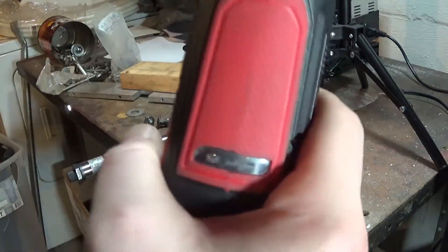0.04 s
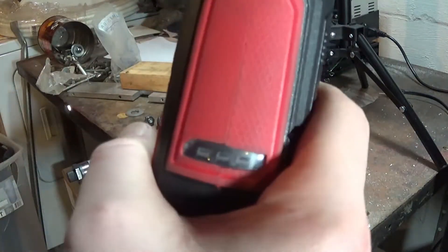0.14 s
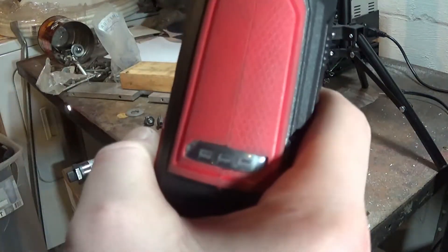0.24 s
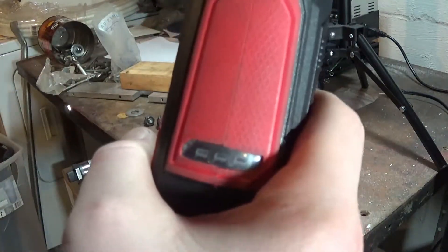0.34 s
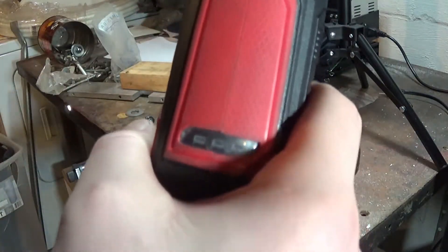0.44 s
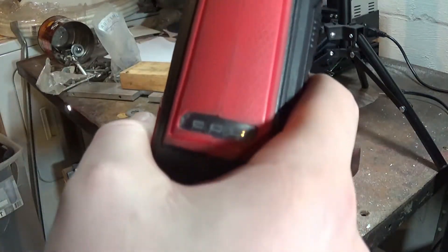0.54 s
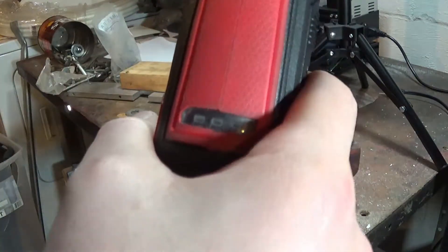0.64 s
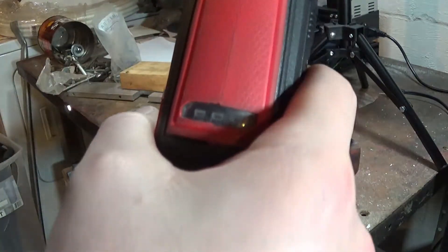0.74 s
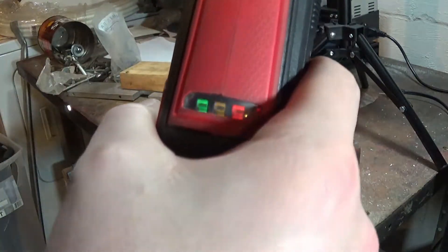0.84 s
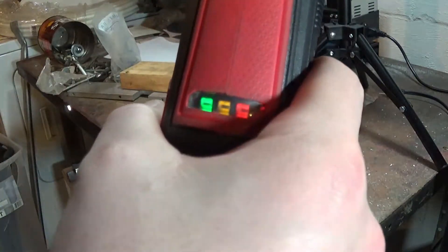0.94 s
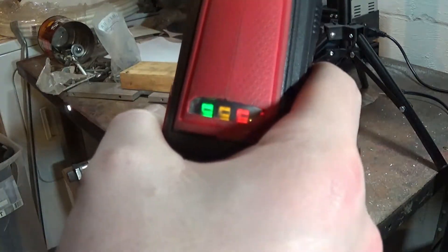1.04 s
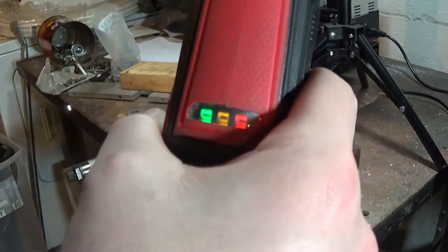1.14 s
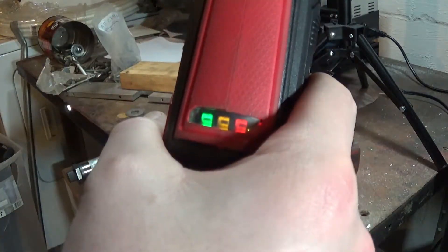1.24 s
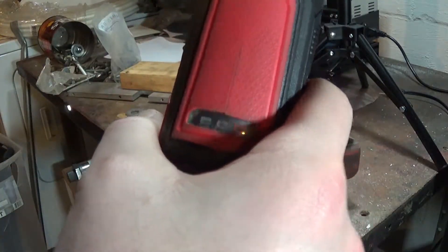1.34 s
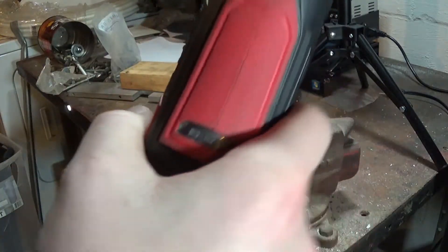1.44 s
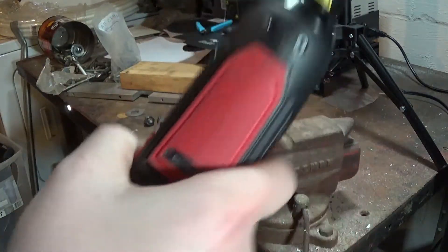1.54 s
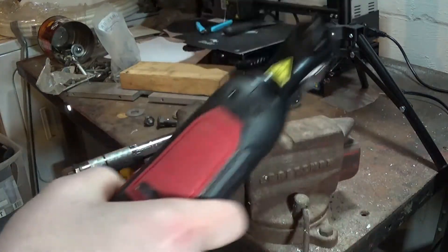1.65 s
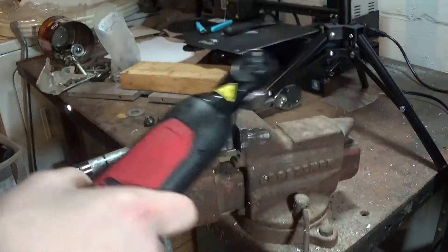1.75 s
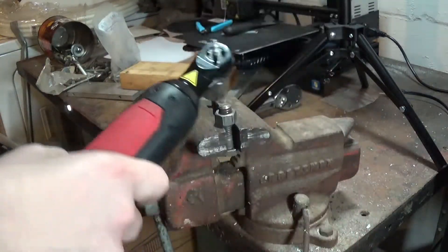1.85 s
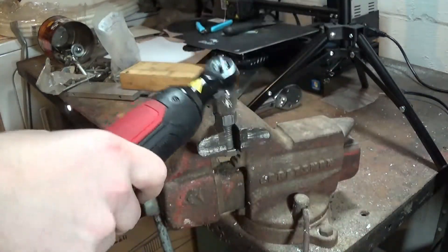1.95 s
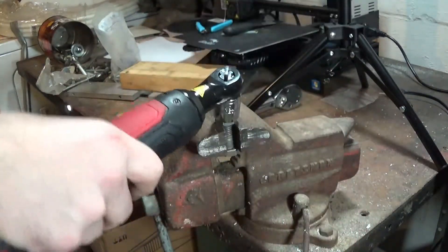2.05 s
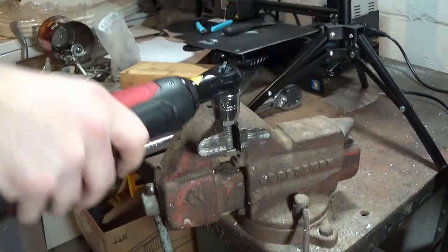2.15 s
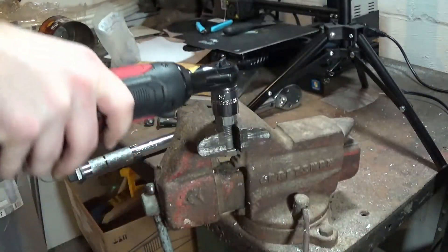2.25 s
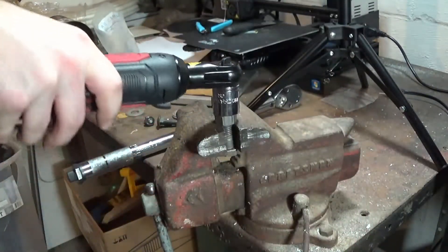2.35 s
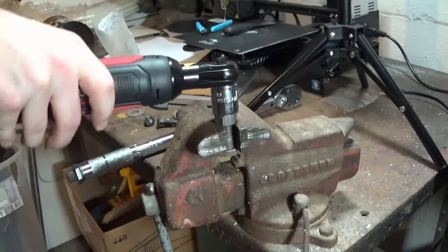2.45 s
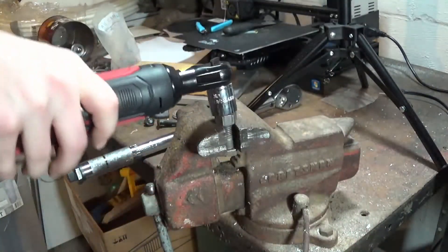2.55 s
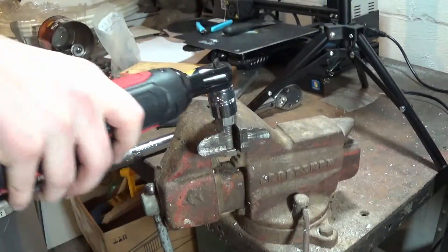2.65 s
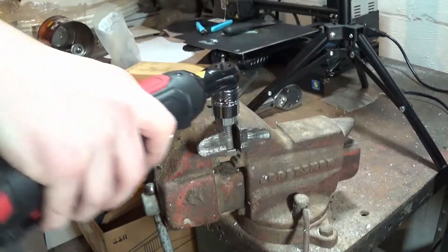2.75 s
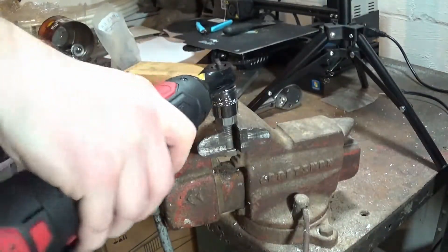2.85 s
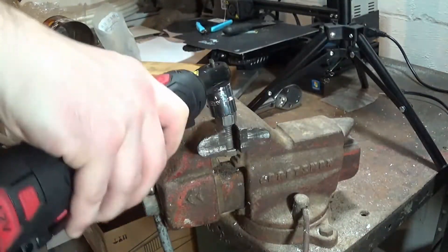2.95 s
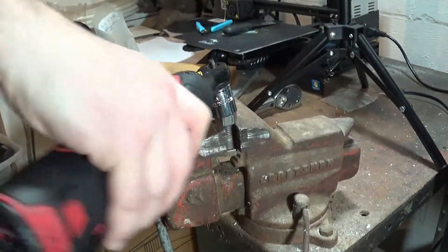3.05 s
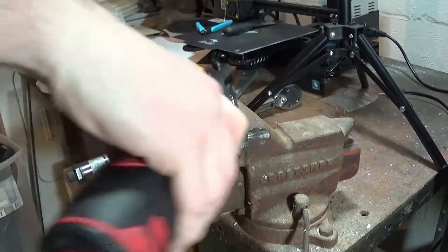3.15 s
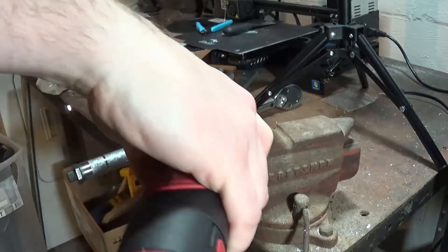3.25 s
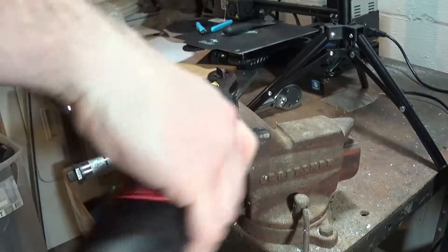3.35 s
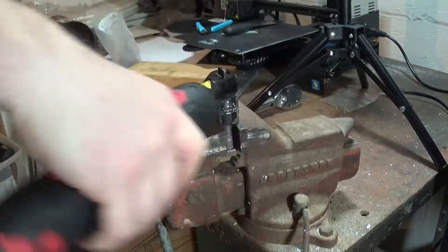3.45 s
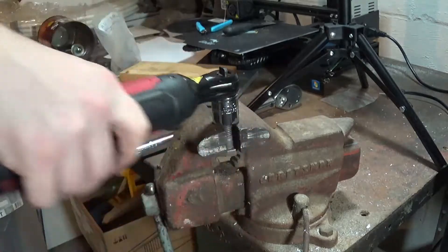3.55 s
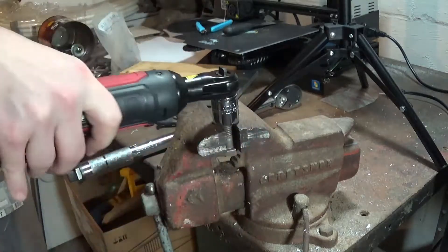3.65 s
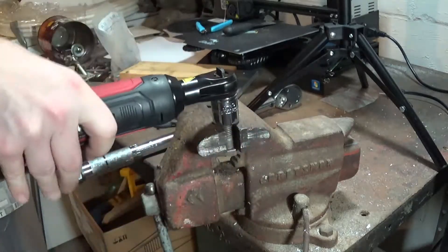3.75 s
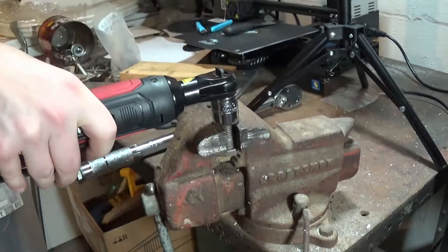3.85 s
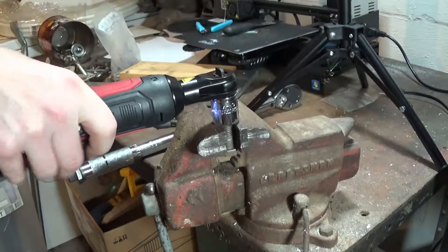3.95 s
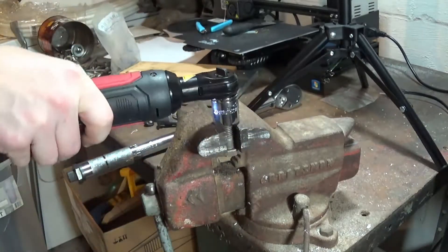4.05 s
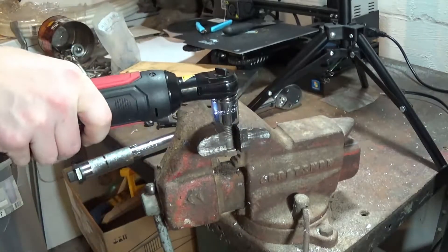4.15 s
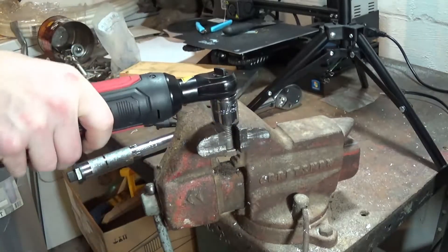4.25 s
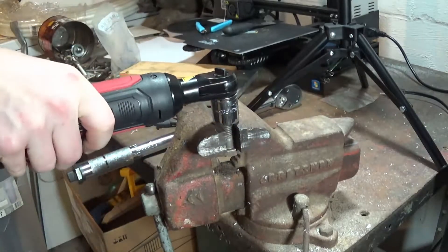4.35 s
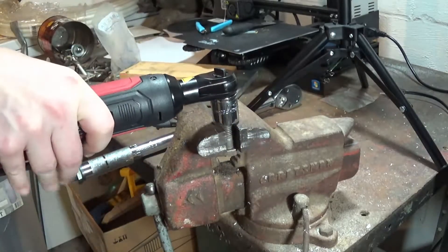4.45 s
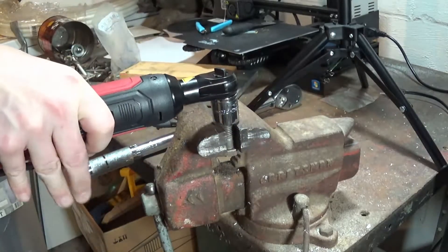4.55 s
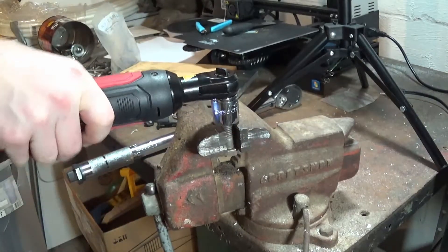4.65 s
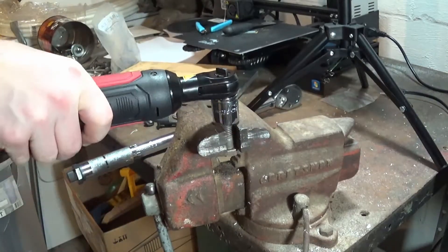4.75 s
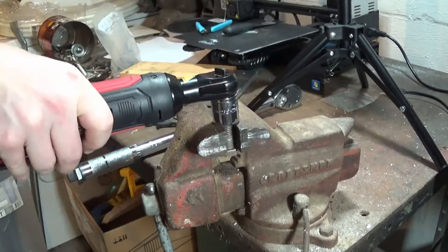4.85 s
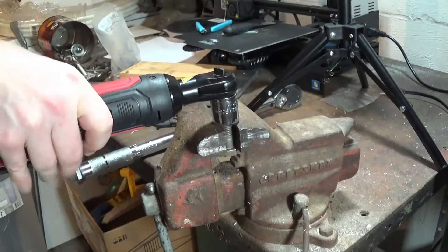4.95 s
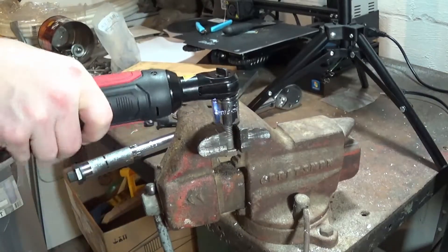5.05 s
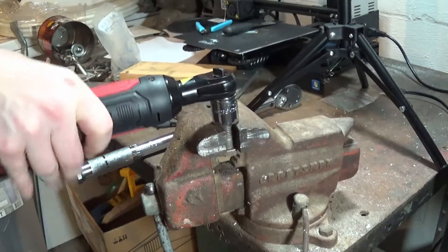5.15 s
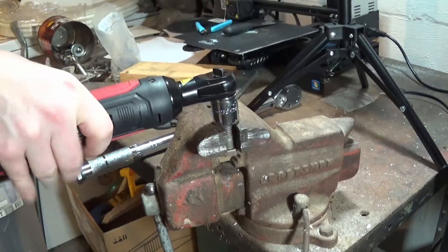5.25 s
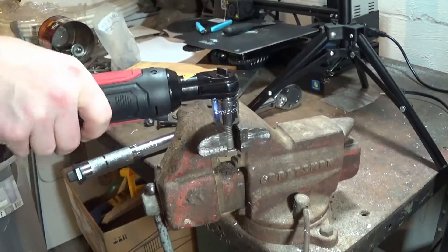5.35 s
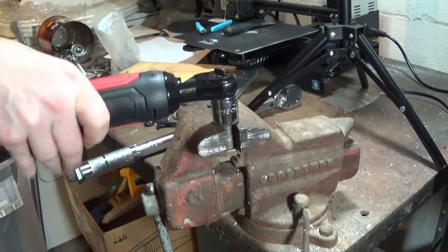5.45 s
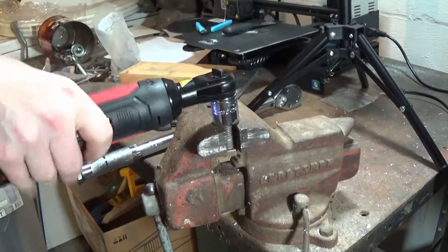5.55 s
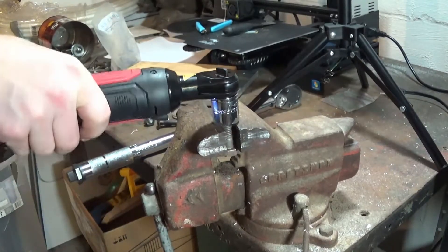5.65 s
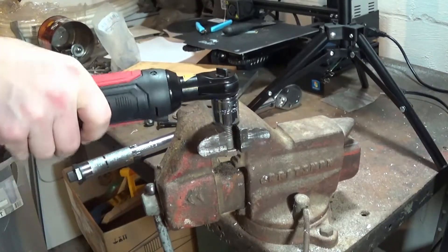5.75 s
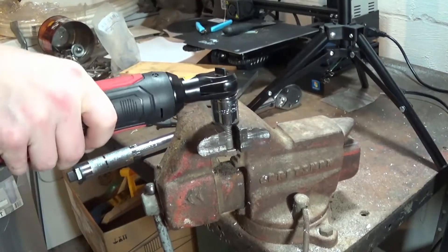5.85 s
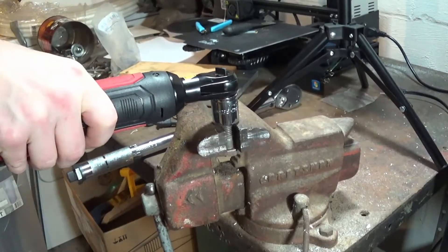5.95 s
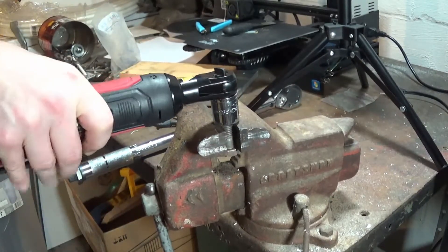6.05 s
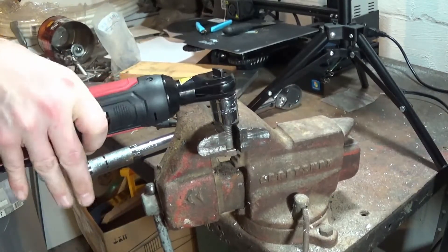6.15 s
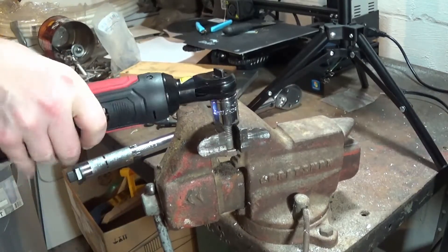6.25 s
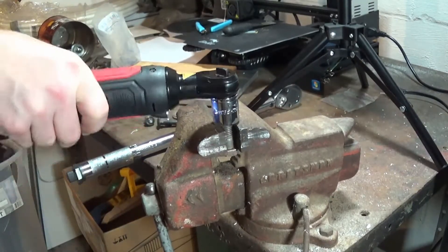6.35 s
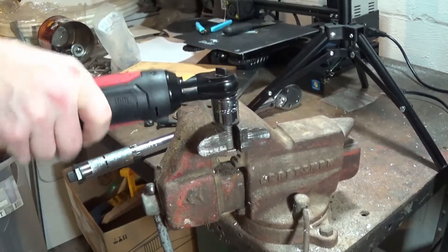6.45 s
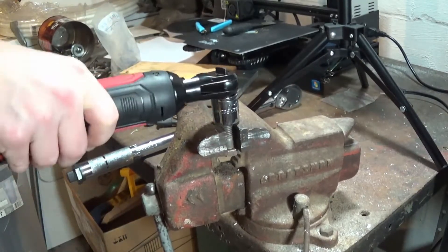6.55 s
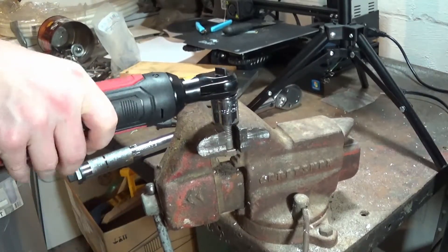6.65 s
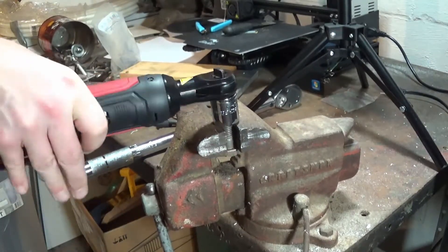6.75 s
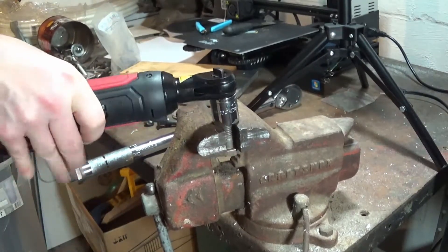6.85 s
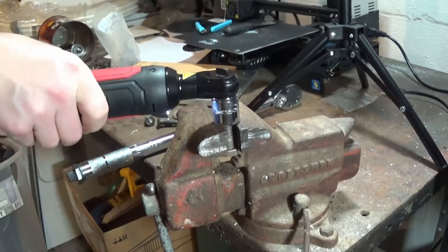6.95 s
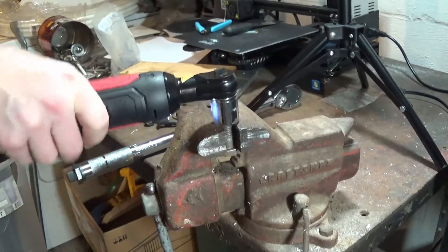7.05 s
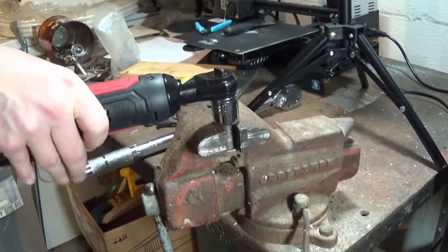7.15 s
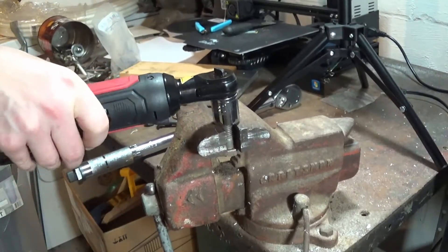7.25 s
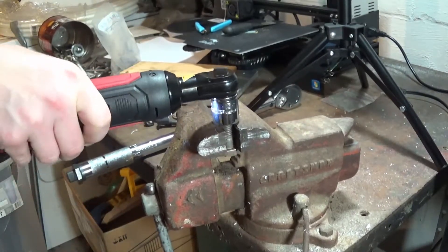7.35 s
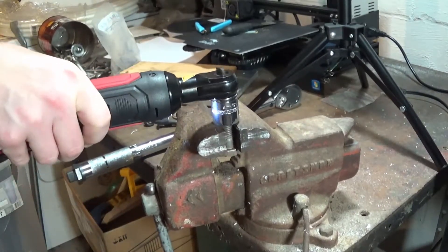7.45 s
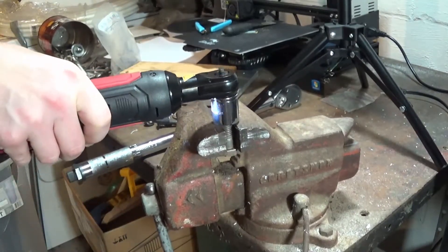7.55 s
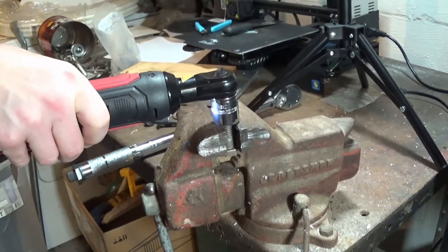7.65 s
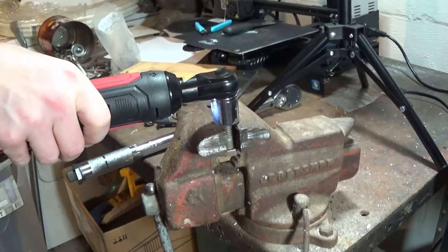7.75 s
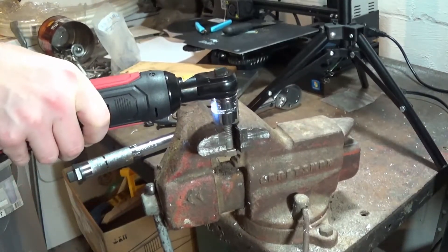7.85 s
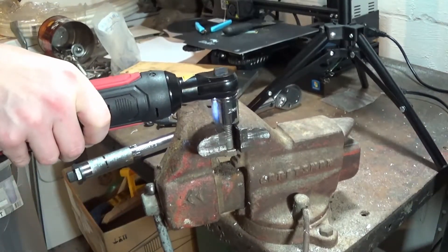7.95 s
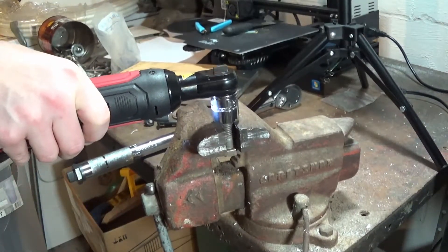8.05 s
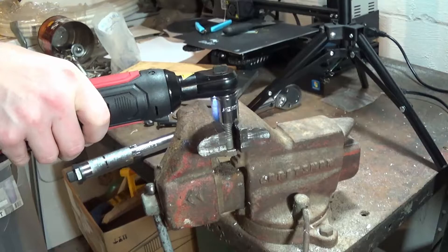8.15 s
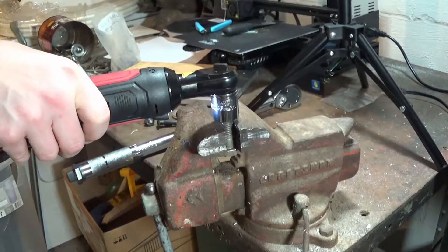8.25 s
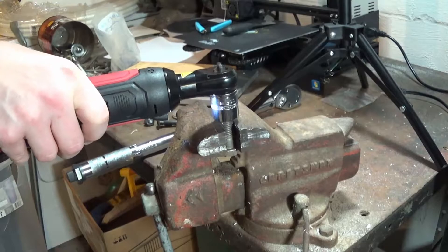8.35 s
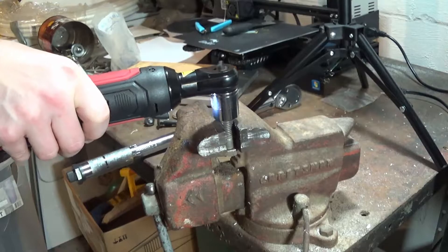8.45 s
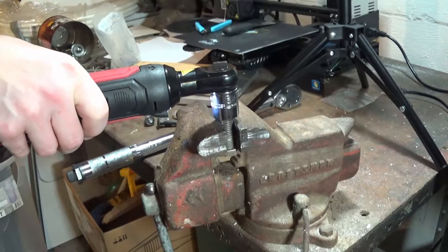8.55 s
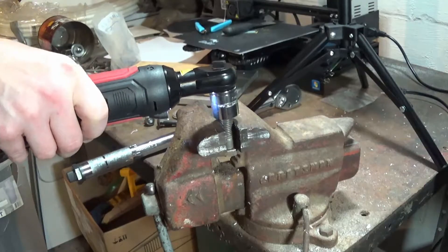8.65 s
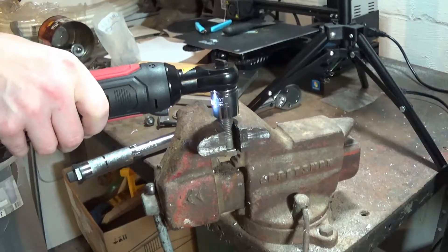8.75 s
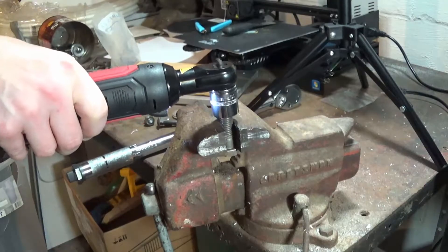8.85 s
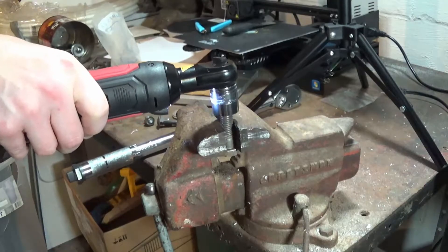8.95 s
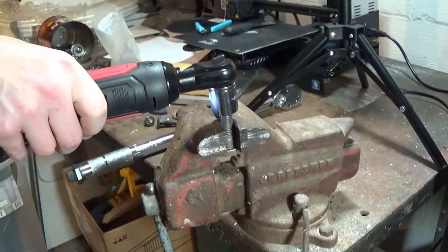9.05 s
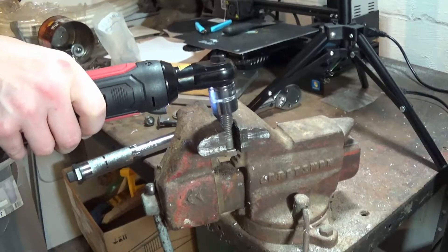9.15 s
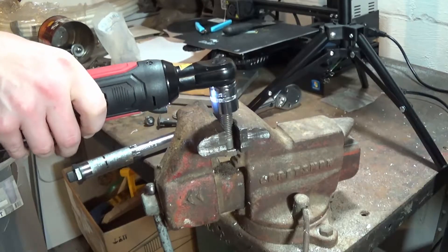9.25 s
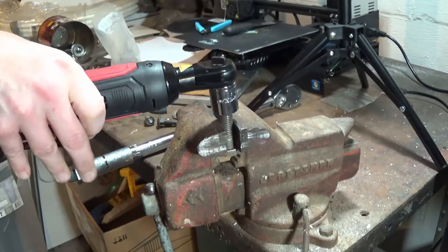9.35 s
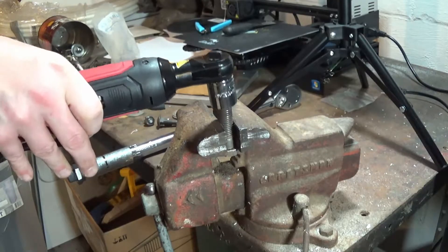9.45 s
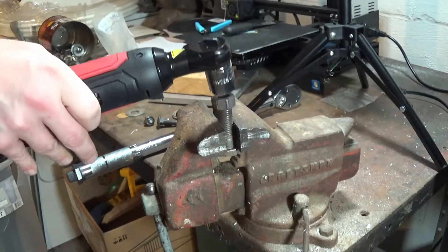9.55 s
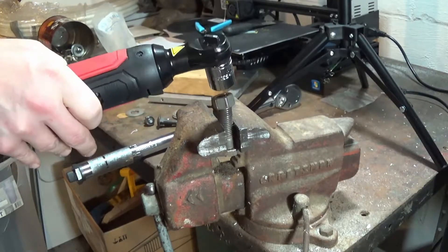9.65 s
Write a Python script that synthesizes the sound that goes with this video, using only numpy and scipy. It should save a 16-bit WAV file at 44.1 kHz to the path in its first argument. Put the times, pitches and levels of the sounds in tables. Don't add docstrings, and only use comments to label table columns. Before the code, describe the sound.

A cordless ratchet wrench whirs free up close, its socket clatters onto a bolt, strains in short clicking bursts, then buzzes in one long run.

```python
import sys
import numpy as np
from scipy import signal
from scipy.io import wavfile
from scipy.ndimage import uniform_filter1d, minimum_filter1d

SR = 44100
rng = np.random.default_rng(int(sys.argv[2]) if len(sys.argv) > 2 else 0)


def rack_gain(trim_db):
    fader = np.asarray(trim_db, float)
    return 10 ** (fader / 20)


def transcribe(u):
    v = np.clip(np.atleast_2d(u).T, -1, 1)
    q = np.round(v * 32767).astype(np.int16)
    wavfile.write(sys.argv[1], SR, q)


N = 428211

# freq_hz, density_db_per_hz
HISS_TONE = [(15, -23.5), (25, -32.5), (114, -18.5), (229, -10.5), (531, -7), (2220, -10), (3160, -6.5),
             (3820, -10.5), (8590, -12.5), (13600, -17), (16000, -10.5)]
HISS_DB = -56.5
# freq_hz, t60_s
ROOM_DECAY = [(250, .3), (1000, .28), (2200, .22), (5000, .23), (12000, .15)]

# start_s, peak_db, pitch_hz
THUMPS = [(3.79, -60, 144), (4.1, -41.5, 143), (4.681, -41, 154), (5.497, -33, 145), (5.63, -39.5, 153),
          (6.141, -53, 145), (6.332, -36.5, 148), (7.172, -45, 144), (9.298, -66, 120)]
# start_s, length_s, pitch_hz, level_db
SQUEAKS = [(0.025, 0.09, 1815, -55.5), (1.588, 0.063, 8100, -59), (5.71, 0.033, 7900, -54),
           (9.614, 0.014, 13000, -64), (9.649, 0.006, 12000, -57), (9.645, 0.032, 4800, -62),
           (9.512, .03, 5100, -45), (9.512, .015, 7000, -44)]
# time_s, level_db
RUSTLE = [
    [(0.78, -84.5), (0.9, -36.5)],
    [(1.58, -85), (1.87, -75), (2.0, -67)],
    [(2.18, -50), (2.326, -61.5), (3.19, -55.5)],
    [(3.36, -45), (3.52, -57), (3.96, -64)],
    [(4.25, -42), (4.39, -49.5), (4.6, -50), (4.83, -45), (4.97, -46.5)],
    [(5.05, -39), (5.24, -42.5), (5.44, -34.5), (5.65, -38.5), (5.75, -42), (5.85, -40), (6.0, -42.5)],
    [(6.08, -36.5), (6.24, -45), (6.42, -28.5), (6.6, -47.5), (6.75, -39), (6.9, -51)],
    [(9.42, -60), (9.558, -68), (9.71, -74)],
]
# freq_hz, density_db_per_hz
RUSTLE_TONE = [(35, -92), (60, -34.5), (274, -16), (492, -11), (1040, -7.5), (1580, -9), (2000, 0),
               (3340, 4), (4220, 2), (8120, -12.5), (16000, -22)]
RUSTLE_LOW_DB, RUSTLE_LOW_SHARE = -12, 0.78
# start_s, length_s, level_db
ROCKS = [(7.4, 0.083, -32.5), (7.628, .08, -35.5), (7.799, 0.1, -33), (8.014, 0.12, -36),
         (8.134, 0.055, -38), (8.28, 0.087, -26), (8.39, 0.085, -39), (8.493, 0.098, -27),
         (8.662, 0.065, -34), (8.754, 0.1, -29), (8.891, 0.072, -31.5), (9.435, 0.068, -51)]
ROCK_HZ, ROCK_WIDTH_HZ = 884, 98

# freq_hz, level_db, t60_s
VISE_MODES = [(280, -57, 5), (398, -50, .6), (520, -52, .5), (673, -53, 4), (705, -47, .5), (762, -45, .55),
              (840, -47, .6)]
SHAKES_DB = [4, -7]
# freq_hz, level_db, t60_s
SOCKET_MODES = [
    [(1044, -19, 0.7), (1095, -15, .15), (985, -19, .15), (1890, -12, .12), (2665, -9, 0.3),
     (3300, -12, .2), (4950, -8, .18), (4097, -4, 0.26), (5647, -9, 0.25), (7084, -8, 0.19),
     (8667, -10, 0.17), (8791, -10, 0.18)],
    [(1036, -18, .55), (1090, -17, .15), (980, -21, .15), (1260, -12, .08), (1890, -14, .12),
     (2665, -18, .25), (3257, -9, .2), (3575, -1, .16), (4075, -9, .24), (4840, -10, .2), (5650, -10, .16),
     (6944, -9, .17)],
]
CLANGS_DB = [-11.5, -10.5]
# start_s, level_db
TAPS = [(2.489, -37), (2.603, -27.5), (3.154, -37), (3.472, -41), (3.601, -40)]
# time_s, level_db
CHATTER = [
    [(1.994, -23.5), (2.02, -24), (2.06, -29.5), (2.17, -55)],
    [(3.19, -14.5), (3.225, -23), (3.29, -35)],
]
# freq_hz, density_db_per_hz
CHATTER_TONE = [(88, -63), (150, -33), (612, -16), (871, -18), (1020, -9), (2400, -14), (4240, -1),
                (7620, -11), (10400, -13), (16000, -55)]

# start_s, peak_db, pitch_hz
PINGS = [(6.9277, -14, 8600), (6.9721, -20, 8500), (6.972, -2, 9150), (7.0269, -4, 10700),
         (7.0444, -1, 10200), (7.0594, -12, 8920), (7.0744, -9, 10600), (7.0894, -5, 9400),
         (7.1024, -11, 9300), (7.114, 0, 10400), (7.1287, -2, 9600), (7.1425, -4, 10400),
         (7.1574, -4, 10200), (7.3213, -12, 10200), (7.3344, -15, 9240), (7.3494, -16, 9300),
         (7.3744, -12, 8910), (7.387, -4, 10200), (7.3994, 0, 9000)]
# start_s, peak_db, pitch_hz, t60_s
KNOCKS = [(2.4885, -33, 1900, 0.044), (2.4885, -37, 5200, .03), (2.787, -21, 4240, .04),
          (2.796, -25, 2080, .02), (2.927, -13, 2320, 0.012), (2.927, -10, 2050, 0.011),
          (2.927, -8, 5530, 0.0067), (2.927, -12.5, 3720, 0.0071), (3.7425, -13, 3060, 0.017),
          (3.7425, -19.5, 1975, 0.035), (4.4008, -25, 2000, .025), (4.4008, -22, 3520, .015),
          (5.301, -17, 4500, 0.013), (5.591, -22, 3520, .012), (5.7655, -27, 2640, .012),
          (5.7655, -12, 8240, 0.0086)]
# start_s, peak_db, body_hz, rattle_db (re peak) trigger, with a few sharp hits of the
TRIGGER = [(0.788, -21.5, 2660, -3.5), (0.796, -13, 2580, -34), (0.8264, -17.5, 2750, -16.5),
           (0.884, -0.5, 3540, -19), (1.39, -6.5, 9400, -14.5), (.952, -9.5, 5830, -29.5),
           (1.238, -2, 5980, -27.5), (3.964, -5.5, 5710, -15.5), (4.234, -13.5, 8400, -17),
           (4.625, -7, 5840, -6.5), (4.9884, -7, 5750, -9.5), (5.2875, -6.5, 5780, -35),
           (5.5783, -3.5, 5370, -16), (6.024, -16, 5200, -6), (6.274, -5.5, 5220, -7.5),
           (6.658, -12, 4870, -16), (6.9062, -5, 5250, -9.5), (7.2818, -15, 5400, -3.5),
           (7.3017, -8, 3770, -18)]
TEETH = [(1.9938, -8, 4850, -39), (2.011, 3, 4150, -43), (3.413, -11, 3840, -12), (3.4723, -8.5, 3900, -18),
         (3.522, -6, 3720, -17.5), (3.5622, -8.5, 3900, -17), (3.6015, -8.5, 3900, -13.5),
         (3.6593, -12.5, 3770, -5), (4.3865, -22, 5000, -16), (5.1802, -18.5, 4130, -14),
         (5.7655, -11.5, 3560, -10), (6.0568, -22.5, 4857, -3), (6.4506, -11.5, 4080, -26),
         (6.507, -10.5, 4230, -17), (6.536, -11.5, 4580, -10), (5.82, -36, 9500, -16),
         (5.832, -25, 9500, -18), (6.686, -24, 7000, -17), (6.692, -29, 7000, -26)]
PAWL = [(0.9132, -6.5, 3450, -24.5), (2.7835, -17.5, 4260, 3), (2.795, -13.5, 4130, -31),
        (2.821, -17, 4150, -47), (2.9124, -26.5, 4370, -3), (3.1812, -13.5, 3660, -2),
        (3.1913, -7, 4100, -32), (3.9877, 3.5, 2220, -11.5), (4.357, -30, 3910, 15),
        (4.401, -5.5, 4900, -38), (4.518, -26, 4160, 0), (4.588, -26.5, 4200, 5), (4.8603, -10, 5100, -16),
        (4.8723, -4.5, 5330, -20.5), (5.15, -11, 3950, -17), (5.1583, -6.5, 5330, -8),
        (5.002, -8.5, 3000, -13), (5.128, -23, 8000, -15), (5.278, -21, 6000, -17), (5.447, -5, 9430, -18),
        (5.707, -26, 4500, -6), (6.292, -2.5, 4500, -20), (6.2957, -6, 4500, -19), (6.663, -24, 3500, -20),
        (3.058, -35, 3500, -15), (3.148, -26, 6000, -17), (0.925, -4.5, 5970, -22.5),
        (5.2646, -19, 4200, 12), (5.76, -21, 4500, -4), (5.42, -26, 3480, 10.5), (5.301, -4.5, 4850, -16.5),
        (5.5892, -4, 5350, -13.5), (5.875, -12, 3930, -8), (5.897, -14, 4100, -39), (6.0397, -2, 5000, -33),
        (6.109, -12.5, 3910, 10), (6.248, -21, 4020, 2), (6.671, -3.5, 5300, -16), (6.741, -17.5, 5020, 4),
        (9.512, -40, 6900, 1), (9.536, -44, 5000, -8)]
BUMPS = [(0.395, -43, 6550, -25), (1.5966, -47, 4600, -5), (1.806, -30.5, 5100, -50),
         (1.917, -43.5, 2820, 1), (2.194, -33, 1700, -20), (2.2775, -18.5, 5900, -9),
         (2.488, -20, 1920, -8), (2.582, -25, 5970, -17), (2.603, -28.5, 1750, 5.5),
         (2.894, -30, 4430, -10), (2.924, -12, 2400, -38), (3.1554, -23.5, 1790, -5),
         (3.385, -26, 4090, -15), (3.738, -29.5, 3000, -13.5), (3.7423, -16.5, 2250, -10),
         (3.823, -32.5, 1890, -37), (4.644, -4.5, 1680, -22), (4.778, -21.5, 1660, -4.5),
         (5.1145, -22.5, 1830, -2), (9.443, -32, 3160, -8), (9.613, -43, 3600, 3)]
# thud_db, snap_db (re peak), thud_db_per_db, snap_db_per_db (of strength)
KINDS = [
    (-37.5, -3.5, -1.11, 0.62),
    (-26, -1, -0.67, 0.21),
    (-38.5, -14, -0.73, 0.29),
    (-10.5, -14.5, -0.019, -0.081),
]
TAIL_DULLING_DB = [13, 6.7, 27, 10]
# freq_hz, density_db_per_hz
CLICK_TONE = [(35, -81), (60, -34), (274, -18), (492, -12.5), (1040, -7), (1580, -8.5), (2000, -2.5),
              (3340, 0.5), (4220, -0.5), (8120, -7), (11000, -13.5), (16000, -35)]

# time_s, head_db, load (0-1)
FREE = [(0.908, -30, 0.9), (0.912, -16, 0.88), (1.14, -14.5, 0.43), (1.17, -14.5, 0.64), (1.368, -16, 0.7),
        (1.394, -24, 0.2)]
# time_s, head_db, load (0-1)
BACKOFF = [(7.31, -18, 0.94), (7.33, -17.5, 0.64), (7.92, -18.5, 0.53), (8.53, -18.5, 0.74),
           (9.23, -19, 0.081), (9.32, -19, 0.43), (9.35, -30, 0.24)]
# time_s, head_db, load (0-1)
LOOSE = [(6.925, -30, 0.4), (7.0, -29, 0.3), (7.08, -19, 0.4), (7.163, -18, 1)]
# start_s, length_s, top_db, top_share (of length), stall (0-1)
STRAIN = [(3.985, 0.23, -14, 0.63, 0.29), (4.633, 0.095, -15.5, 0.52, 0.5),
          (4.994, 0.095, -19.5, 0.38, 0.74), (5.292, 0.097, -27.5, 0.59, 0.98),
          (5.427, 0.15, -13.5, 0.59, 0.36), (5.592, 0.11, -31, 0.033, .99),
          (6.104, 0.059, -28.5, 0.06, 0.5), (6.292, 0.11, -12, 0.42, 0.31), (6.92, 0.25, -13, 0.18, 0.03),
          (7.166, 0.081, -22.5, 0.18, 0.33)]
# time_s, turns_hz
CRANK = [(.9, 24.5), (1.1, 27), (1.35, 31), (3.9, 39), (6.9, 40), (7.03, 64), (7.16, 74), (7.3, 86),
         (7.95, 89.3), (8.3, 88.6), (8.57, 86.5), (8.75, 89), (9.35, 90)]
# time_s, peak_db
FREE_HITS = [(0.9118, -4), (0.924, -5), (0.9445, -10.5), (0.9634, 1.5), (0.9857, -3.5), (0.9932, 0),
             (1.0013, -2), (1.0234, -3), (1.06, -6.5), (1.068, -7), (1.076, 0), (1.098, -1.5), (1.1154, 2),
             (1.1343, -2.5), (1.1523, -6.5), (1.1703, 0.5), (1.1877, -1.5), (1.205, -4.5), (1.2196, 5),
             (1.2537, -3), (1.271, -7), (1.2873, -4), (1.303, -4), (1.316, 2.5), (1.3377, -5.5),
             (1.3444, -6), (1.3513, -5.5), (1.3765, 2)]
# freq_hz, width_hz, level_db
FREE_TONE = [(18, -75), (30, -45), (170, -47), (740, -14), (913, -19), (1190, -12), (1590, -15), (1960, -5),
             (2480, -11), (3400, -1), (10500, -10), (16000, -37)]
FREE_PEAKS = [(2010, 300, -10), (3460, 450, 0), (6100, 900, -2), (10600, 900, -4)]
BACK_TONE = [(18, -56), (30, -35), (204, -37), (540, -18), (889, -8.5), (1300, -16.5), (1760, -8),
             (2410, -11), (3220, -2), (7090, -1.5), (9220, 6.5), (12300, 0.5), (16000, -12.5)]
BACK_PEAKS = [(890, 80, -5.5), (2000, 530, -3.5), (10030, 1400, -2.5)]
STRAIN_TONE = [(35, -76), (60, -34), (193, -20.5), (607, 5.5), (1280, -6.5), (2250, 1.5), (2650, -1),
               (4420, 0.5), (10500, -14), (14200, -32.5), (16000, -37.5)]
STRAIN_PEAKS = [(592, 330, -27.5), (2110, 31, -13), (4040, 210, -5.5)]
FREE_KNOCKS_DB = [0, -1, -7, -2, -4, -9]
BACK_KNOCKS_DB = [0, -4.5, -10]
STRAIN_KNOCKS_DB = [0, -4, -2, -5, -1, -4, -3]
BACK_PLACES = [0, -.19, -.2]
# unloaded_db, full_load_db
FREE_RUMBLE_DB = (-21.5, -10)
FREE_FIZZ_DB = (-1.4, -7.5)
BACK_RUMBLE_DB = (-25.5, -10)
BACK_FIZZ_DB = (0.66, -3)
# start_db, top_db, end_db
GRIP_RUMBLE_DB = (-13.5, -9.5, -9.5)
GRIP_FIZZ_DB = (0.93, -6.5, 0.7)
# top_db, end_db
STALL_FIZZ_DB = (-16.5, -55.5)
STALL_RUMBLE_DB = 29
BITE_DB, SAG_DB, STALL_DB = -4.5, -16.5, -8.5


def evened(x):
    return x / np.sqrt(np.mean(x ** 2, -1, keepdims=True) + 1e-20)


def read(points, hz):
    f, value = np.transpose(points)
    return np.interp(np.log(hz + 1), np.log(f + 1), value)


def unroll(rows):
    s, *columns = np.transpose(rows)
    t = np.arange(s[0], s[-1], 1 / SR)
    return s[0], [np.interp(t, s, c) for c in columns]


def add(mix, s, sound):
    part = mix[round(s * SR):][:len(sound)]
    part += sound[:len(part)]


def ends(size, ms):
    return signal.windows.tukey(size, min(2 * ms / 1000 * SR / size, 1))


def smoothed(x, size):
    return uniform_filter1d(uniform_filter1d(x, size), size)


def coloured(x, tone, peaks=(), lift_db=0):
    hz = abs(np.fft.fftfreq(4096, 1 / SR))
    gain_db = read(tone, hz)
    for f, width_hz, db in peaks:
        gain_db = gain_db + (lift_db + db / 2) / (1 + (2 * (hz - f) / width_hz) ** 2)
    taps = np.fft.ifft(np.exp(np.conj(signal.hilbert(gain_db * np.log(10) / 20)))).real
    return signal.oaconvolve(x, taps[:2048])[:len(x)]


def thirds(x):
    parts = []
    for cut_hz, kind in [(1500, "low"), ((1500, 7000), "band"), (7000, "high")]:
        sos = signal.butter(4, cut_hz, kind, fs=SR, output="sos")
        parts.append(evened(signal.sosfilt(sos, x)))
    return parts


def patchy(x, depth_db):
    z = signal.stft(x, nperseg=512)[2]
    field = uniform_filter1d(rng.standard_normal(z.shape), 9, 0)
    field = uniform_filter1d(field, 6, 1)
    return signal.istft(z * rack_gain(depth_db * field / field.std()), nperseg=512)[1][:len(x)]


def ring(modes, rough_db, smooth_ms):
    t = np.arange(SR) / SR
    waver = evened(smoothed(rng.standard_normal((len(modes), SR)), round(smooth_ms * SR / 1000)))
    tones = [rack_gain(db - 60 * t / t60) * np.sin(2 * np.pi * hz * t) for hz, db, t60 in modes]
    return (tones * rack_gain(rough_db * waver)).sum(0) * (1 - np.exp(-t / 0.002))


def camera():
    shared, left, right = (evened(coloured(n, HISS_TONE)) for n in rng.standard_normal((3, N)))
    t = np.arange(700) / SR
    tick = np.sin(2 * np.pi * 3200 * t) + .3 * np.sin(2 * np.pi * 6450 * t)
    tick *= np.exp(-((t - .006) / .0011) ** 2)
    ticks = np.zeros(N)
    for k, db in enumerate(2.5 * rng.standard_normal(int(N / SR * 30))):
        add(ticks, .032 + k / 29.97, rack_gain(db) * tick)
    return rack_gain(HISS_DB) * (shared + 0.17 * np.array([left, right])) + rack_gain(-48.0) * ticks


def room(x):
    taps = np.zeros((6, SR // 2))
    at = np.arange(120, SR // 2 - 20, 20) + rng.integers(0, 20, (6, (SR // 2 - 121) // 20))
    np.put_along_axis(taps, at, rng.choice([-1., 1.], at.shape), 1)
    taps[3:] = 0.87 * taps[:3] + 1.22 * taps[3:]
    hz, t, z = signal.stft(taps, SR, nperseg=256)
    decay = rack_gain(-60 * t / read(ROOM_DECAY, hz)[:, None])
    tail = signal.istft(z * decay, SR, nperseg=256)[1]
    tail = tail.reshape(2, 3, -1) / np.linalg.norm(tail[0])
    phase = 7 * np.arange(N) / SR + np.arange(3)[:, None] / 3
    turns = np.cos(2 * np.pi * phase) * np.sqrt(2 / 3)
    return signal.oaconvolve((x * turns)[None], tail, axes=2).sum(1)[:, :N]


def bench_thumps():
    out, t = np.zeros(N), np.arange(9000) / SR
    for s, db, hz in THUMPS:
        add(out, s, rack_gain(db - 60 * t / 0.24) * (1 - np.exp(-t / 0.0061)) * np.sin(2 * np.pi * hz * t))
    return out


def squeaks():
    out, t = np.zeros(N), np.arange(9000) / SR
    for s, length, hz, db in SQUEAKS:
        fuzz = evened(smoothed(rng.standard_normal(round(length * SR)), 40))
        add(out, s, rack_gain(db) * fuzz * np.sin(2 * np.pi * hz * t[:len(fuzz)]) * ends(len(fuzz), 3))
    return out


def rustle():
    out = np.zeros(N)
    for rows in RUSTLE:
        s, (db,) = unroll(rows)
        clumps = rack_gain(4 * evened(uniform_filter1d(rng.standard_normal(len(db)), 900)))
        low, mid, high = thirds(coloured(clumps * rng.standard_normal(len(db)), RUSTLE_TONE))
        rub = rack_gain(db - 4.5) * (mid + rack_gain(-13.0) * high)
        rub += rack_gain(RUSTLE_LOW_DB + RUSTLE_LOW_SHARE * db) * low
        add(out, s, rub * ends(len(db), 2.9))
    return out


def rocking():
    out = np.zeros(N)
    edges_hz = [ROCK_HZ - ROCK_WIDTH_HZ / 2, ROCK_HZ + ROCK_WIDTH_HZ / 2]
    sos = signal.butter(1, edges_hz, "band", fs=SR, output="sos")
    fuzz = evened(signal.sosfilt(sos, rng.standard_normal(N)))
    for s, length, db in ROCKS:
        swell = np.hanning(round(length * SR))
        add(out, s, rack_gain(db + 0.5) * swell * fuzz[round(s * SR):][:len(swell)])
    return out


def vise_handle():
    out, size = np.zeros(N), SR // 2
    for (start, length, *_), db in zip(STRAIN, SHAKES_DB):
        add(out, start + length - .04, rack_gain(db) * ring(VISE_MODES, 1.5, 12)[:size] * ends(size, 30))
    return out


def socket_walls():
    out = np.zeros(N)
    for rows, modes, clang_db in zip(CHATTER, SOCKET_MODES, CLANGS_DB):
        add(out, rows[0][0] + .005, rack_gain(clang_db) * ring(modes, 4, 2))
    for s, db in TAPS:
        low_modes = [(hz, db + low_db + 9, .6 * t60) for hz, low_db, t60 in SOCKET_MODES[0][:3]]
        add(out, s, ring(low_modes, 4, 4))
    return out


def socket_chatter():
    out = np.zeros(N)
    for rows in CHATTER:
        s, (db,) = unroll(rows)
        size = len(db)
        hits = rack_gain(5.4 * rng.standard_normal(size)) * (rng.random(size) < 7000 / SR)
        chatter = evened(coloured(hits * rng.standard_normal(size), CHATTER_TONE)) * ends(size, 0.97)
        add(out, s, rack_gain(db + 5.5) * chatter)
    return out


def pings():
    out, t = np.zeros(N), np.arange(4000) / SR
    rows = [(s, db + 0.5, hz, .007) for s, db, hz in PINGS] + KNOCKS
    for s, db, hz, t60 in rows:
        pair = np.sin(2 * np.pi * hz * t) + 0.21 * np.sin(2 * np.pi * 1.5 * hz * t)
        add(out, s, rack_gain(db - 60 * t / t60) * (1 - np.exp(-t / 0.00038)) * pair)
    return out


def click_rows():
    found = []
    for rows, kind, dulling_db in zip((TRIGGER, TEETH, PAWL, BUMPS), KINDS, TAIL_DULLING_DB):
        thud_db, snap_db, thud_slope, snap_slope = kind
        for s, db, hz, rattle_db in rows:
            found.append((s, db, thud_db + thud_slope * db, snap_db + snap_slope * db,
                          hz, rattle_db, dulling_db))
    return found


def clicks():
    out, t = np.zeros(N), np.arange(4400) / SR - .01
    after = np.maximum(t, 0)
    rows = click_rows()
    noise = rng.standard_normal((len(rows), len(t)))
    noise[:, np.argmax(t > 0)] = 3
    for (s, db, low_db, high_db, hz, rattle_db, dulling_db), n in zip(rows, noise):
        spit = rack_gain(-60 * after / .0055) * (t > 0)
        rattle = rack_gain(rattle_db - 60 * after / .12) * (1 - np.exp(-after / .002))
        slide = rack_gain(rattle_db - 6.5 - 60 * abs(t) / 0.018)
        body = coloured(n * (spit + rattle + slide), CLICK_TONE, [(hz, .32 * hz, 0)], 6.5)
        low, mid, high = thirds(body)
        snap = rack_gain(high_db + 6 - np.minimum(after / 0.024, 1) * dulling_db) * high
        click = (mid + rack_gain(low_db + 8.5) * low + snap) / abs(mid).max()
        add(out, s - .01, rack_gain(db - 1.5) * click * np.cos(np.pi / 2 * after / t[-1]))
    return signal.sosfilt(signal.butter(3, 380, "high", fs=SR, output="sos"), out)


def loaded(rows, rumble_db, fizz_db):
    s, db, load = np.transpose(rows)
    low_db = rumble_db[0] + load * (rumble_db[1] - rumble_db[0])
    high_db = fizz_db[0] + load * (fizz_db[1] - fizz_db[0])
    return np.transpose([s, db, low_db, high_db])


def burst(start, length, db, top, stall):
    s = start + length * np.array([0, np.clip(top, .02, .98), 1])
    level_db = db + np.array([BITE_DB, 0, SAG_DB + STALL_DB * max(stall, 0)])
    low_db = GRIP_RUMBLE_DB + stall * np.array([0, .3, 1]) * STALL_RUMBLE_DB
    high_db = GRIP_FIZZ_DB + stall * np.array([0, *STALL_FIZZ_DB])
    return np.transpose([s, level_db, low_db, high_db])


def motor(rows, tone, peaks, knocks_db, slop, spread_db, knock_ms, grind_db, lift_db, patchy_db,
          places=0, hits=(), fade_ms=4.0):
    s, (head_db, low_db, high_db) = unroll(rows)
    size, count = len(head_db), len(knocks_db)
    turns_hz = np.interp(s + np.arange(size) / SR, *np.transpose(CRANK))
    step = np.cumsum(turns_hz) / SR * count
    at = np.flatnonzero(np.diff(np.floor(step)))
    which = step[at].astype(int) % count
    luck = rng.standard_normal((len(at), 2))
    late = slop * luck[:, 0] + (np.ones(count) * places)[which]
    late = late * SR / (turns_hz[at] * count)
    train = np.zeros(size)
    spots = np.clip(at + late, 0, size - 1).astype(int)
    train[spots] = rack_gain(np.array(knocks_db)[which] + spread_db * luck[:, 1])
    for when, db in hits:
        train[round((when - s) * SR)] = rack_gain(2 * db + 9)
    jolt = signal.lfilter([1], [1, -np.exp(-1000 / (knock_ms * SR))], train)
    drive = (evened(jolt) + rack_gain(grind_db)) * rng.standard_normal(size)
    low, mid, high = thirds(patchy(coloured(drive, tone, peaks, lift_db), patchy_db))
    low = patchy(low, 1.0)
    return s, rack_gain(head_db) * (mid + rack_gain(low_db) * low + rack_gain(high_db) * high) * ends(size, fade_ms)


def wrench():
    out = np.zeros(N)
    add(out, *motor(loaded(FREE, FREE_RUMBLE_DB, FREE_FIZZ_DB), FREE_TONE, FREE_PEAKS, FREE_KNOCKS_DB,
                    slop=.26, spread_db=3.5, knock_ms=1.5, grind_db=-10, lift_db=5, patchy_db=.8,
                    hits=FREE_HITS))
    for rows, slop, spread_db, patchy_db in [(BACKOFF, .06, 2, 1.0), (LOOSE, .1, 3, 1.5)]:
        add(out, *motor(loaded(rows, BACK_RUMBLE_DB, BACK_FIZZ_DB), BACK_TONE, BACK_PEAKS, BACK_KNOCKS_DB,
                        slop, spread_db, knock_ms=1.1, grind_db=0, lift_db=5, patchy_db=patchy_db,
                        places=BACK_PLACES))
    for row in STRAIN:
        add(out, *motor(burst(*row), STRAIN_TONE, STRAIN_PEAKS, STRAIN_KNOCKS_DB,
                        slop=.3, spread_db=4, knock_ms=1.1, grind_db=0, lift_db=4, patchy_db=1.5,
                        fade_ms=9))
    return out


def scene():
    near = wrench() + socket_chatter() + clicks() + rustle() + bench_thumps() + squeaks() + rocking()
    recent = signal.lfilter([1 / (4 * SR)], [1, 1 / (4 * SR) - 1], near ** 2)
    held_close = np.arange(N) < 1.5 * SR
    out = near * rack_gain(np.array([[.2], [-.2]]))
    out = out + rack_gain(-8) * room(near * rack_gain(-9 * held_close))
    out = out + vise_handle() + pings()
    out = out + socket_walls() * rack_gain(np.array([[1], [-1]]))
    return out + camera() / (1 + recent / rack_gain(-46))


def band_limit(x):
    return signal.sosfilt(signal.butter(12, 16530, fs=SR, output="sos"), x)


def record(dry):
    mid, side = (dry[0] + dry[1]) / 2, (dry[0] - dry[1]) / 2
    side = signal.sosfilt(signal.butter(1, 650, "high", fs=SR, output="sos"), side)
    side = signal.sosfilt(signal.butter(2, 10000, fs=SR, output="sos"), side)
    both = np.array([mid + side, mid - side])
    gain = minimum_filter1d(np.minimum(.93 / (abs(both).max(0) + 1e-9), 1), 65)
    limited = both * uniform_filter1d(gain, 65)
    limited = signal.sosfilt(signal.butter(1, 22, "high", fs=SR, output="sos"), limited)
    edge = signal.firwin(255, 15800, window=("kaiser", 9), fs=SR)
    return band_limit(signal.oaconvolve(limited, edge[None], "same"))


dry = scene()
out = record(dry)
transcribe(out)
```